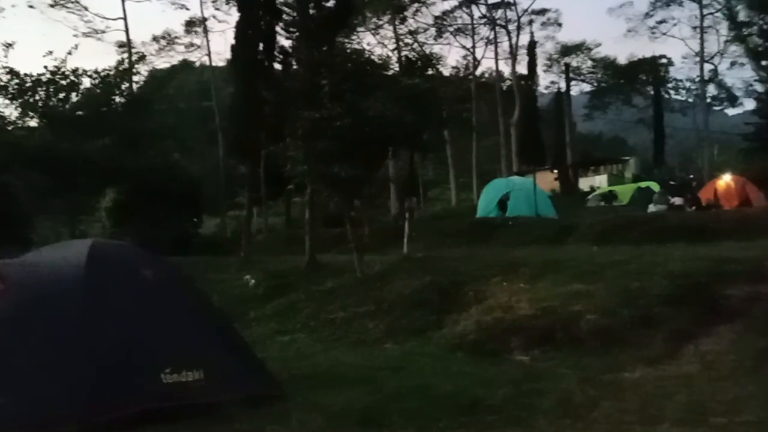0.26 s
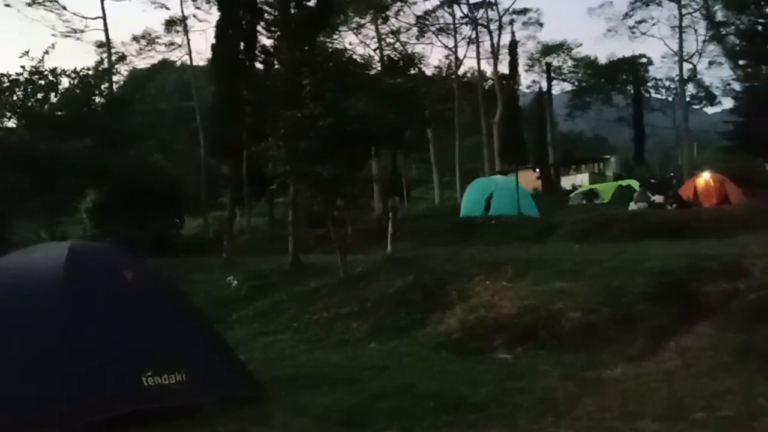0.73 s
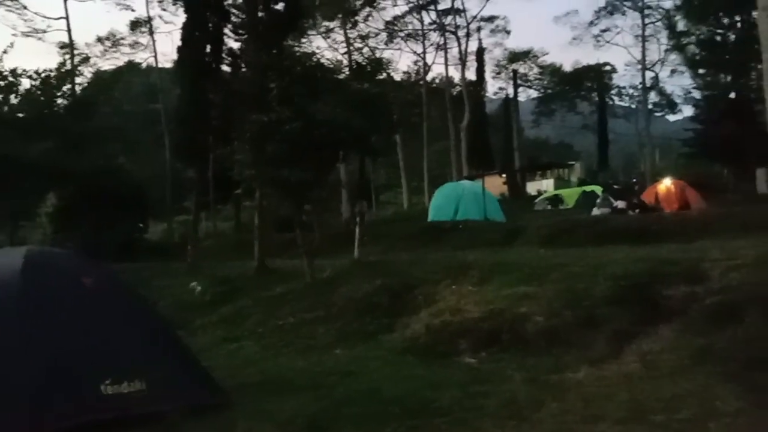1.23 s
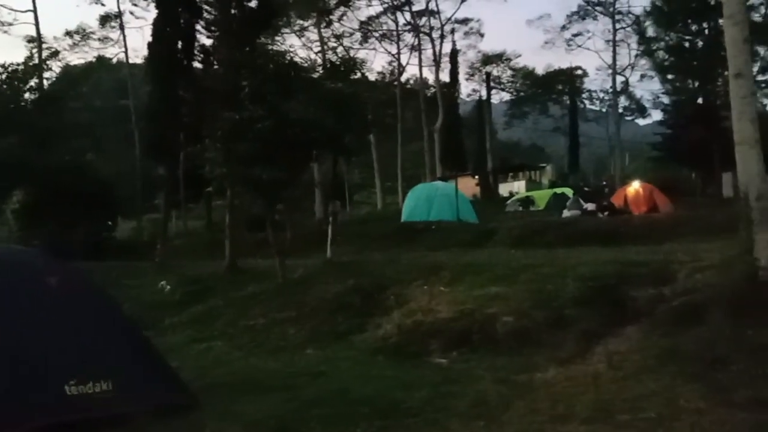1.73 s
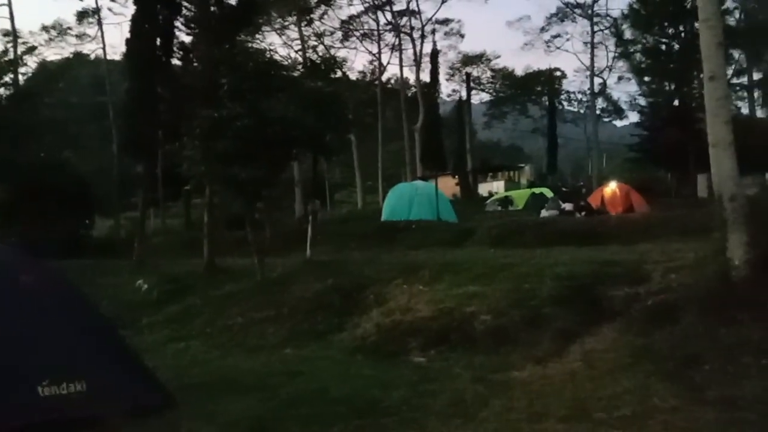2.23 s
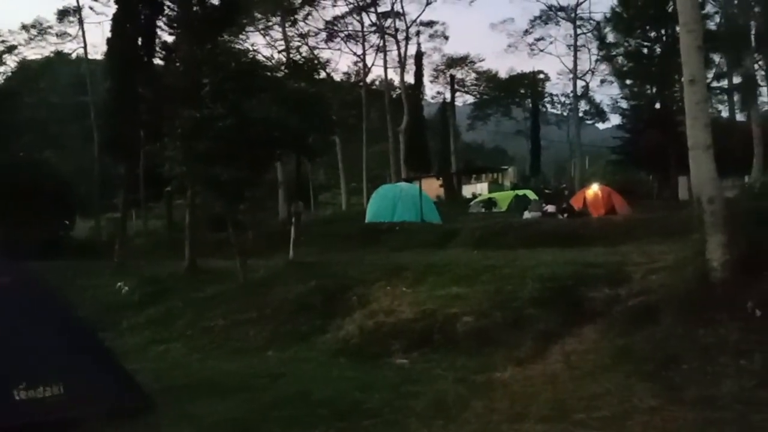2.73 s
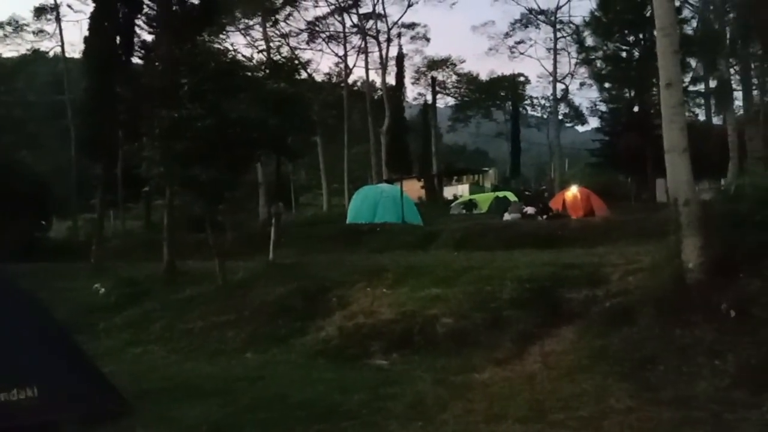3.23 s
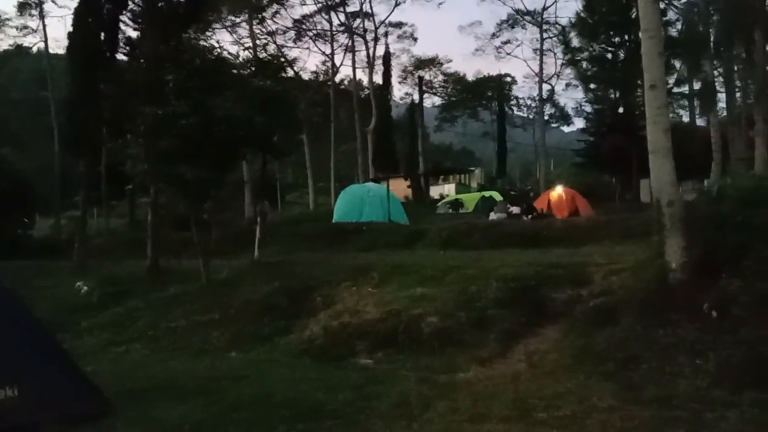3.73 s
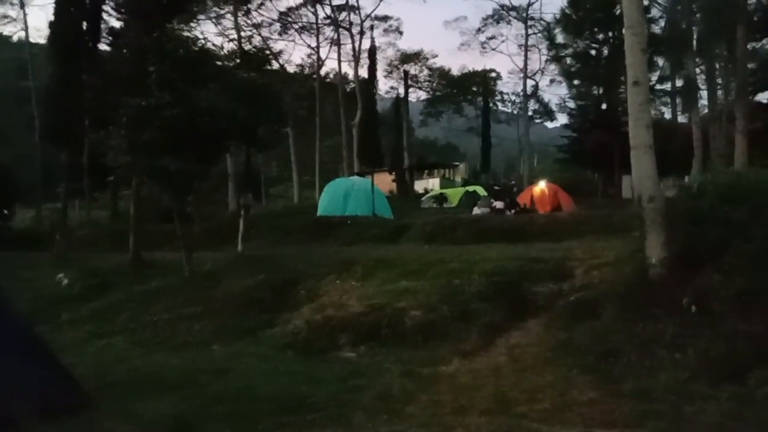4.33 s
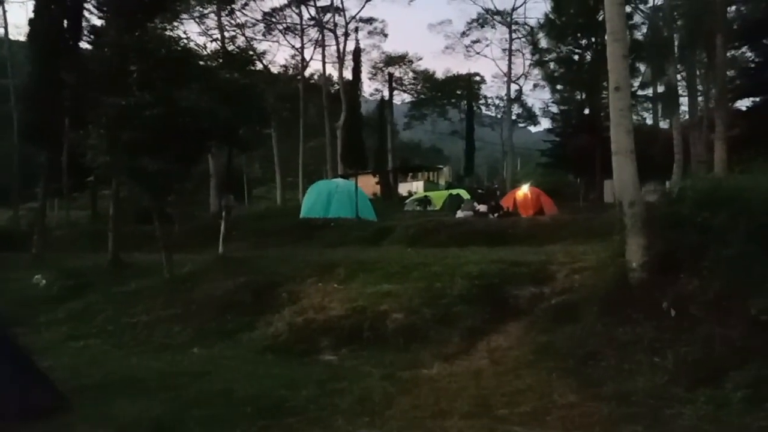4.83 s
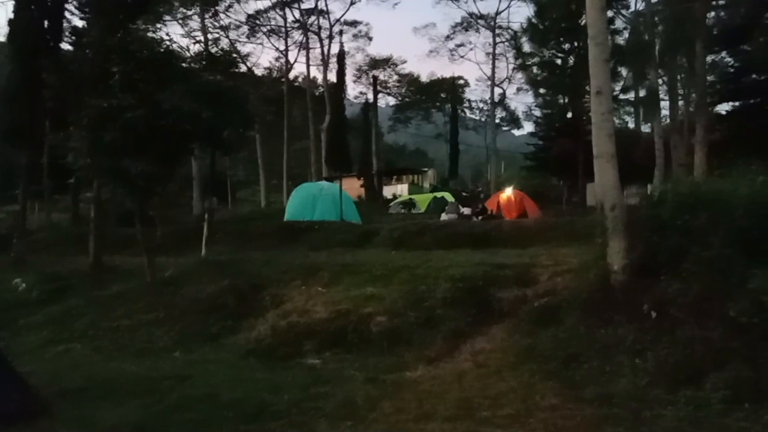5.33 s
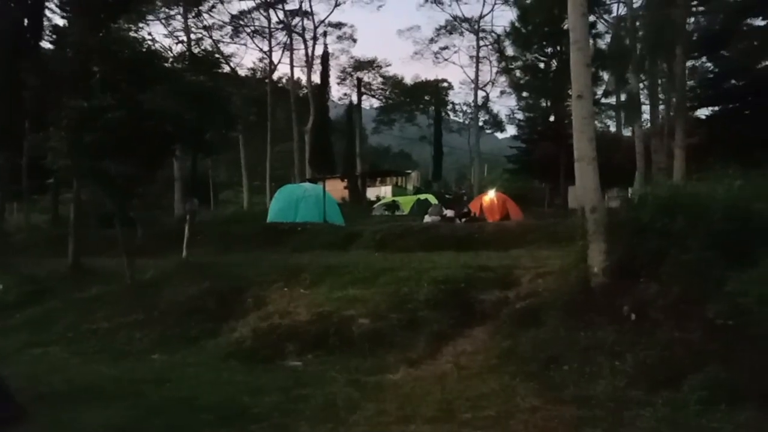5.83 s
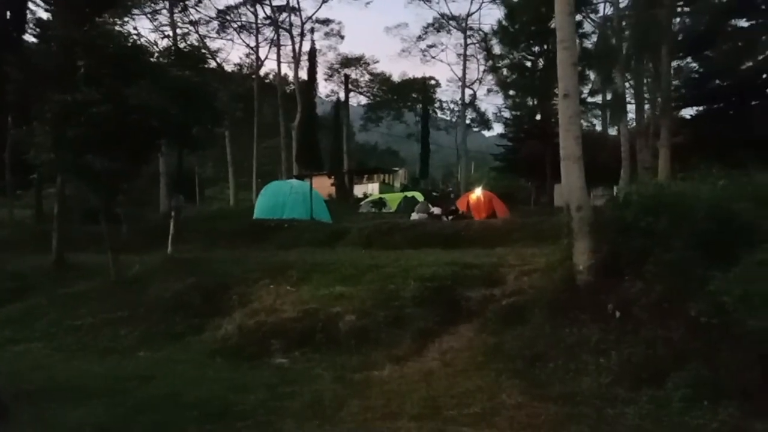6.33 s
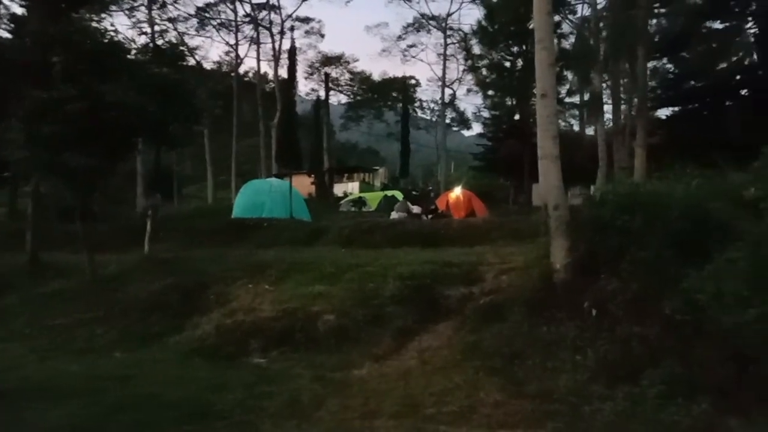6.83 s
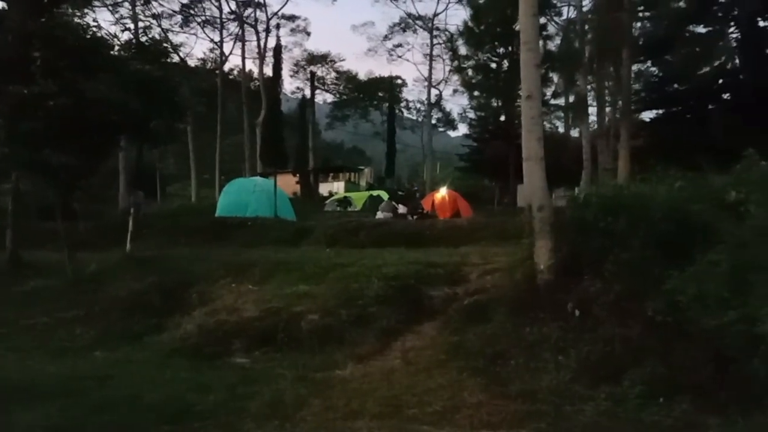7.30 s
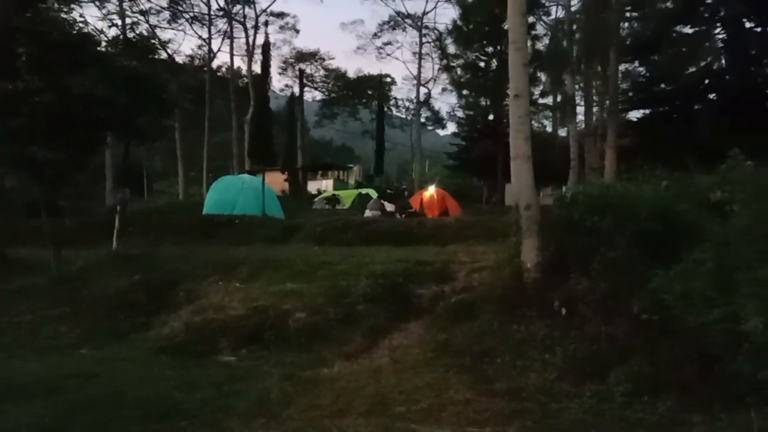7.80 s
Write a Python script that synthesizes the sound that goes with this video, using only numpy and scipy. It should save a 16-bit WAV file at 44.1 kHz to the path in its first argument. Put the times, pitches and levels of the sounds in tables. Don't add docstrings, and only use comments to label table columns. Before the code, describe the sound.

Dusk in open woodland, heard through a handheld phone. From the start, short bird whistles around 2 to 3.5 kilohertz glide, hook or hold, each lasting only a fraction of a second, with a brief diffuse echo from the trunks. Behind them is a continuous grainy chorus of far birds and insects, thin high katydid buzzing, leafy hiss and a faint low motor drone. A small cricket rasp comes about every second. Notes cluster in the first second, become sparser from 1 to 3, gather again at 3.4 to 4.1, and are loudest around 4.8 to 5.8 and 6.2 to 6.8. Soft, dull finger bumps start near 0.7, firmer at 5.5, 5.7, 6.6 and 7.3. At 7.6 a hard little knock bounces once. Throughout, noise suppression opens on loud calls and shuts afterward, making the background pump, until the chorus simply continues to the end at 8.

```python
import sys
import numpy as np
from scipy import signal
from scipy.fft import rfft, irfft, next_fast_len
from scipy.io import wavfile
from scipy.ndimage import uniform_filter1d

SR = 44100
rng = np.random.default_rng(int(sys.argv[2]) if len(sys.argv) > 2 else 0)


def master(y):
    cut = np.clip(np.atleast_2d(y).T, -1, 1)
    pcm = np.round(cut * 32767)
    wavfile.write(sys.argv[1], SR, pcm.astype(np.int16))


def invert_db(level):
    return 10 ** (np.asarray(level, dtype=float) / 20)


N = 355434
TIME = np.arange(N) / SR
SIZE = next_fast_len(N)
FREQ = np.arange(1, SIZE // 2 + 2) * SR / SIZE

# start in seconds, length in seconds, middle pitch in Hz,
# middle level in dB.
RISING_FADING = [
    (.286, .12, 3340, -53.5),
    (.598, .049, 2730, -48),
    (.728, 0.046, 2750, -45.5),
    (1.481, .049, 2510, -50.5),
    (2.246, .061, 2900, -46.5),
    (3.867, .038, 2690, -45.5),
    (5.2, .06, 3150, -52),
    (6.643, .064, 2590, -42.5),
    (7.0, .025, 2730, -45.5),
]
RISING_SWELLING = [
    (.565, 0.049, 2218, -44.5),
    (1.82, 0.022, 3080, -53.5),
    (3.647, 0.012, 2865, -48.5),
    (4.047, .054, 2640, -44),
    (5.08, 0.031, 3517, -38),
    (6.687, 0.06, 2106, -43.5),
]
HELD_FADING = [(.06, .13, 2767, -55.5), (.505, 0.082, 3070, -46.5), (.14, .06, 2140, -60),
               (.93, .02, 1660, -49.5), (2.832, 0.018, 3300, -58.5), (1.108, 0.026, 3240, -54.5),
               (1.358, .03, 2660, -55), (3.397, 0.017, 2800, -46), (3.427, 0.025, 2790, -43),
               (3.47, .035, 3280, -52), (3.54, .16, 3300, -58), (6.593, 0.049, 2720, -36.5),
               (6.76, 0.019, 2233, -41.5), (7.043, 0.22, 2700, -53.5)]
HELD_SWELLING = [(4.383, 0.027, 3100, -57), (.775, 0.062, 3200, -51), (.846, 0.081, 2540, -39.5),
                 (.875, .04, 3200, -49), (3.693, 0.11, 2660, -50.5), (4.764, 0.028, 3134, -37.5),
                 (4.852, .075, 2842, -35), (5.909, 0.049, 2600, -49), (6.206, 0.025, 3190, -42.5),
                 (6.555, .03, 2800, -44), (6.68, .052, 3120, -48.5), (7.936, 0.025, 3384, -44)]
FALLING_SWELLING = [
    (.632, 0.04, 2785, -49.5),
    (.759, 0.026, 2650, -45),
    (2.19, .06, 2960, -39),
    (3.742, 0.067, 3180, -51),
    (5.036, .06, 2555, -34.5),
    (6.335, 0.13, 2625, -45),
    (6.477, 0.045, 2660, -44),
    (7.26, .03, 2720, -43),
]
FALLING_FADING = [
    (.967, 0.073, 2264, -50.5),
    (2.34, .035, 2870, -52),
    (3.455, .03, 2680, -48.5),
    (3.515, 0.067, 2760, -46.5),
    (5.47, 0.029, 2920, -56),
    (6.025, 0.036, 2790, -50.5),
    (5.97, .035, 2250, -48),
]
# start in seconds, length in seconds, middle pitch in Hz,
# middle level in dB.
PEEPS = [(.14, 0.11, 3190, -63.5), (1.6, .025, 2830, -60.5), (2.53, 0.063, 3650, -70),
         (3.07, 0.047, 3360, -61.5), (4.79, 0.081, 2550, -58), (6.25, 0.048, 2710, -53.5),
         (6.29, 0.037, 3430, -53.5), (6.3, 0.038, 2680, -52), (7.19, .035, 2770, -48.5),
         (7.71, .015, 3440, -60), (7.745, .015, 3300, -57), (7.875, .012, 3420, -58),
         (7.275, .012, 3420, -54), (7.32, .015, 3120, -50), (7.9, 0.0099, 3150, -61),
         (5.56, .03, 3250, -49), (6.5, .07, 2600, -47.5), (5.47, 0.033, 2930, -48.5)]
# start in seconds, length in seconds, settled pitch in Hz,
# middle level in dB, swing in Hz (+ from above, - from below).
HOOKED_FADING = [(.238, .045, 3200, -47, 330), (.33, .093, 2714, -39.5, 351), (.655, .084, 2675, -39, 199),
                 (1.445, .02, 2810, -52, 300), (1.79, 0.027, 2940, -51.5, 330),
                 (2.578, 0.043, 2740, -54, 249), (2.93, 0.04, 2260, -48.5, 501),
                 (2.996, .025, 2220, -52, 450), (5.272, 0.071, 3207, -38.5, -200),
                 (5.352, .05, 2938, -36.5, -300), (6.965, .025, 2680, -46.5, 153),
                 (2.873, 0.046, 2193, -49.5, -150), (5.396, 0.052, 2927, -37.5, 201),
                 (3.757, .055, 2750, -37.5, -200), (3.897, .033, 3080, -36, -350),
                 (2.157, .03, 3030, -45, 250), (7.765, .035, 2680, -52, 300)]
HOOKED_SWELLING = [
    (.445, .045, 3050, -46, 260),
    (1.468, 0.066, 2900, -44, 180),
    (1.657, .045, 3497, -43, 149),
    (4.43, .03, 2830, -52, 120),
    (5.63, 0.054, 2985, -33, -350),
    (5.685, .082, 2850, -33, -650),
    (5.744, 0.037, 3220, -39.5, -200),
    (3.15, .06, 2780, -50.5, 121),
    (2.05, .05, 3220, -42, -300),
    (3.607, .075, 2830, -46.5, -600),
]
# start in seconds,
# length in seconds, start pitch in Hz, end pitch in Hz, middle level in dB.
SLURS = [(1.136, .016, 2940, 2680, -47.5), (.92, .05, 2450, 2715, -44.5), (1.875, .07, 2610, 2000, -55),
         (2.85, .022, 3300, 3050, -57.5), (2.742, .01, 2300, 2720, -56), (4.025, .025, 3200, 2680, -51),
         (4.41, .025, 3130, 2800, -52.5), (5.45, .035, 2900, 2650, -47), (5.585, .012, 3290, 2800, -46.5),
         (5.685, .015, 3006, 2800, -39.5), (.886, 0.033, 2600, 1784, -36.5), (3.298, .014, 3000, 2800, -53),
         (3.472, .03, 2640, 2230, -48), (3.505, .022, 3300, 2820, -50), (3.81, .015, 2760, 2600, -46),
         (2.105, .045, 3220, 3100, -51), (5.35, .03, 3420, 3200, -46), (4.095, 0.0093, 2790, 3100, -45.5),
         (5.091, .021, 2390, 2100, -40), (5.285, .045, 2720, 2204, -44.5), (5.4, 0.028, 3390, 4450, -40),
         (6.375, .05, 3300, 4190, -52), (.488, 0.016, 3050, 2380, -41.5), (6.385, 0.045, 2750, 2350, -38),
         (7.288, .035, 2700, 2250, -43), (7.955, 0.039, 2800, 3360, -48.5)]
PUSHES = [
    (.793, .028, 1850, 2420, -44),
    (5.515, .038, 2950, 3380, -41),
    (3.28, .02, 2400, 2950, -56),
    (1.94, 0.021, 4150, 4600, -57.5),
    (2.753, .018, 2720, 2210, -54),
    (4.107, 0.024, 2900, 2307, -41.5),
    (4.35, 0.025, 3620, 3250, -64.5),
    (6.616, .031, 2670, 2350, -35.5),
    (7.21, .12, 1900, 2170, -51.5),
    (7.975, .03, 4000, 4600, -58),
]
HOOTS = [
    (.272, 0.053, 568, 588, -64.5),
    (.345, 0.073, 600, 505, -66),
    (2.952, 0.052, 840, 910, -76),
    (3.9, 0.082, 868, 895, -60.5),
]


def song():
    kinds = [  # notes, glide in Hz, swell in dB from start to end
        (RISING_FADING, 120, -6.5), (RISING_SWELLING, 113, 1.6),
        (HELD_FADING, 0, -5.5), (HELD_SWELLING, 0, 4.8),
        (FALLING_SWELLING, -130, 8), (FALLING_FADING, -200, -7), (PEEPS, -15, -1.9)]
    notes = []
    for rows, glide, swell in kinds:
        for s, length, hz, db in rows:
            notes.append((s, length, hz - glide / 2, hz + glide / 2, db - swell / 2, db + swell / 2, 0))
    for rows, swell in ((HOOKED_FADING, -4), (HOOKED_SWELLING, 3)):
        for s, length, hz, db, swing in rows:
            notes.append((s, length, hz, hz, db - swell / 2, db + swell / 2, swing))
    for rows, swell in ((SLURS, -6), (PUSHES, 9), (HOOTS, 4)):
        for s, length, hz0, hz1, db in rows:
            notes.append((s, length, hz0, hz1, db - swell / 2, db + swell / 2, 0))
    return notes


def leaf_scatter(notes, rest_db):
    s, length, hz0, hz1, db0, db1, swing = np.transpose(notes)
    depth_db = np.interp(s, TIME, rest_db) + 39 - (db0 + db1) / 2
    rough = np.clip(depth_db / 29, .06, .42)
    rough = rough * np.where(hz0 > 1200, 1, .3)
    rough = rough / (1 + abs(hz1 - hz0) / length / 30000)
    return rough * np.where(swing, .8, 1)


def whistles(rows, edge_s, rough):
    out, envelope = np.zeros(N + SR), np.zeros(N + SR)
    scatter = np.pad(walk(70) + 1j * walk(82), (0, SR), "reflect") / np.sqrt(2)
    waver = .025 * scatter.imag[::-1]
    swing_s, swing_db_per_khz = .007, -11
    for n, (s, length, hz0, hz1, db0, db1, *swing) in enumerate(rows):
        t = np.arange(int((length + edge_s) * SR)) / SR
        u = np.clip((t - edge_s / 2) / length, 0, 1)
        here = slice(n * 3001 % N, n * 3001 % N + len(t))
        bend = sum(swing) * np.exp(-u * length / swing_s)
        level_db = db0 + (db1 - db0) * u + swing_db_per_khz * abs(bend) / 1000
        edges = np.clip(np.minimum(t, t[-1] - t) / edge_s, 0, 1)
        shape = invert_db(level_db) * np.sin(np.pi / 2 * edges) ** 2
        pitch = (hz0 + (hz1 - hz0) * u + bend) * (1 + rough[n] * waver[here])
        tone = np.exp(2j * np.pi * np.cumsum(pitch) / SR)
        path = np.sqrt(1 - rough[n]) + np.sqrt(rough[n]) * scatter[here]
        k = max(int((s - edge_s / 2) * SR), 0)
        out[k:k + len(t)] += shape * (tone * path).imag
        envelope[k:k + len(t)] += shape
    return out[:N], envelope[:N]


def wood(x, t60):
    t = np.arange(SR // 2) / SR
    echo = rng.standard_normal(len(t)) * np.exp(-np.log(1000) * t / t60)
    earlier = np.append(x[-len(t):], x)
    return signal.fftconvolve(earlier, echo / np.sqrt(np.sum(echo ** 2)))[len(t):][:N]


def song_echoes(near):
    treble = np.gradient(near) * SR / (2 * np.pi * 2800)
    return invert_db(-14) * wood(treble, 0.53)


# start in seconds, spacing of strokes in seconds, level in dB.
CHIRPS = [
    (0.011, .034, -72),
    (.995, 0.031, -62.5),
    (2.094, 0.031, -60),
    (3.06, 0.031, -63),
    (4.095, 0.034, -63),
    (5.396, .0352, -58.5),
    (6.311, 0.035, -59.5),
    (7.36, 0.028, -58),
]
STROKES = [4, 4, 6, 5, 6, 6, 6, 4]


def cricket():
    strokes = []
    for (s, step, db), count in zip(CHIRPS, STROKES):
        for k in range(count):
            strokes.append((s + k * step, .009, 6330, 6140, db + 0.2 * k + 7.5, db + 0.39 * k + 4.0))
    tones = whistles(strokes, 0.0073, np.full(len(strokes), .3))[0]
    return tones + invert_db(-10.5) * wood(tones, 0.073)


# start in seconds, level in dB.
TAPS = [
    (7.608, -32),
    (7.620, -36),
]
# frequency in Hz, decay by 60 dB in seconds, level in dB.
TAP_MODES = [(1370, 0.061, -21), (1778, 0.053, -1.5), (3100, 0.0099, -8), (4980, 0.0032, -7.5),
             (7100, .007, -17.5), (8450, 0.0071, -19), (11040, 0.0074, -22), (14000, .004, -60)]


def taps():
    t, out = np.arange(SR // 20) / SR, np.zeros(N)
    contact = np.minimum(t / 0.0012, 1) * np.exp(-t / 0.0087) * (t < .011)
    for s, db in TAPS:
        for hz, t60, mode_db in TAP_MODES:
            ring = np.sin(2 * np.pi * hz * t) * np.exp(-np.log(1000) * t / t60)
            knock = signal.fftconvolve(ring, rng.standard_normal(len(t)) * contact)
            knock = knock / abs(knock).max()
            out[int((s - .001) * SR):][:len(knock)] += invert_db(db + mode_db) * knock
    return signal.sosfilt(signal.butter(8, [1180, 14500], "band", fs=SR, output="sos"), out)


# start in seconds, level in dB.
THUDS = [
    (0.73, -73),
    (2.25, -75),
    (3.56, -66.5),
    (3.91, -62.5),
    (4.76, -69),
    (5.51, -57.5),
    (5.71, -59.5),
    (6.36, -74),
    (6.648, -54.5),
    (7.29, -59),
]


def thuds():
    t, out = np.arange(SR // 8) / SR, np.zeros(N)
    for s, db in THUDS:
        out[int(s * SR):][:len(t)] += invert_db(db) * 2.4 * t / 0.02 * np.exp(-t / 0.011)
    return out * (0.33 * band(62, 15) + 0.69 * band(84, 30) + 1.36 * band(150, 25))


def swarm(kinds, scatter_db, wet_db):
    out, count = 0, 1700
    for hz, spread, rate, length, glide, db in kinds:
        when, long = rng.random((2, count))
        pitch, bend, size = np.clip(rng.standard_normal((3, count)), -1.7, 1.7)
        when = when * count / rate
        pitch = hz + spread * pitch
        size = scatter_db * size
        long = length * (0.366 + 1.244 * long)
        rows = np.transpose([when, long, pitch - glide * bend, pitch + glide * bend, size, size])
        calls = whistles(rows[when < N / SR], .011, np.full(count, .45))[0]
        out = out + invert_db(db) * unit(calls)
    return out + invert_db(wet_db) * wood(out, 0.98)


# pitch in Hz, spread in Hz, calls per second, call length in seconds, glide in Hz, level in dB.
FAR_BIRDS = [(1782, 129, 90, 0.0301, 100, -8), (2350, 220, 130, 0.03155, 156.8, 1),
             (2800, 170, 110, 0.0367, 100.3, -0.5), (3250, 80, 50, 0.045, 83, -7)]


def far_birds(lift_db):
    return invert_db(12 + 0.45 * lift_db) * swarm(FAR_BIRDS, 3.5, 1.3)


# pitch in Hz, spread in Hz, calls per second, call length in seconds, glide in Hz, level in dB.
FAR_INSECTS = [(4217, 188.4, 200, .015, 100, -2), (5065, 130, 150, 0.018, 92, -9.5)]


def far_insects():
    return invert_db(7.5) * swarm(FAR_INSECTS, 1.8, 0.99)


# pitch in Hz, spread in Hz, calls per second, call length in seconds, glide in Hz, level in dB.
KATYDIDS = [(11140, 170, 180, 0.02, 70, -0.5), (10400, 280, 30, 0.014, 230, -7)]
# middle in seconds, width in seconds, level change in dB.
KATYDID_BOUTS = [(0, 0.21, -9), (.7, 0.3, 3.5), (2.2, .15, 5), (3.2, .2, 4), (3.8, .15, 6), (4.2, .2, 4),
                 (4.75, .12, 4), (5.75, .2, 4), (6.25, 0.17, -4.5), (6.67, 0.065, 8), (7.36, 0.069, 6.5),
                 (7.4, .55, 7)]


def katydids(lift_db):
    level_db = -95.5 + 0.43 * lift_db + bumps(KATYDID_BOUTS) + 1.3 * walk(6.6)
    return invert_db(level_db) * swarm(KATYDIDS, 5.5, -5)


# frequency in Hz, spectral density in dB per Hz.
AIR = [(60, -26), (300, -2.5), (800, -5.5), (1250, -3.5), (1700, 7.5), (3300, -4.5), (3650, 0), (4300, 8),
       (5400, 1.5), (5850, -5.5), (6500, 6), (7350, 0.5), (8700, -6), (9150, -16), (9330, -27)]


def air():
    hz, db = np.transpose(AIR)
    gain = invert_db(np.interp(np.log(FREQ), np.log(hz), db, left=-60, right=-60))
    return invert_db(13.5) * coloured(gain) * invert_db(1.21 * walk(2))


# frequency in Hz, width in Hz, level in dB.
DRONE_BANDS = [(118, 30.6, -5.5), (160, 33, -4), (95, 29, -10.5), (253.5, 53, -10)]
# time in seconds, pitch in Hz, level over the treble in dB.
HUM = [(0, 160, -9), (4.6, 168, -17), (4.8, 168, 1.5), (6, 158, -17), (6.7, 163, -1), (7.2, 165, 1.5),
       (7.6, 152, 0.5), (8.06, 150, -3)]
# time in seconds, pitch in Hz, level over the treble in dB.
GROWL = [(0, 125.7, -40.5), (5.1, 122.3, -36), (5.25, 126, 2), (6.05, 134.1, -4.5), (6.2, 132, -33),
         (8.06, 130, -43)]
# middle in seconds, width in seconds, level change in dB.
SURGES = [
    (3.04, 0.25, -2.5),
    (3.45, 0.026, 8.5),
    (3.8, 0.27, 4),
    (4.31, 0.027, 11.5),
    (6.0, 0.086, 2),
    (6.63, 0.11, 3),
    (7.42, .1, 3.5),
    (6.3, .12, -5),
    (.6, .25, -4),
    (7.9, .1, -3),
]


def drone(lift_db):
    hum = 0
    for table, octave_db in ((HUM, -25), (GROWL, -9)):
        hum_hz, hum_db = curve(table)
        phase = 2 * np.pi * np.cumsum(hum_hz + 2.0 * walk(3.1)) / SR
        waves = np.sin(phase) + invert_db(octave_db) * np.sin(2 * phase)
        hum = hum + invert_db(hum_db + 1.4 * walk(10.0) + 1.0) * waves
    db = -0.5 - 0.32 * lift_db + bumps(SURGES)
    noise = sum(invert_db(db + part_db + 4.26 * walk(3.2)) * band(hz, width) for hz, width, part_db in DRONE_BANDS)
    return hum + noise


def hiss(gate_db):
    return invert_db(-88 + 0.11 * (gate_db + 77.5)) * band(6400, 9000)


# middle in seconds, width in seconds, pitch
# in Hz, width in octaves, level change in dB.
LULLS = [(5.45, .13, 2200, .12, -6), (6.42, .1, 1650, .15, -6), (5.9, .15, 1600, .15, -5),
         (7.4, .1, 2150, .15, -3), (6.27, .17, 600, .8, -5), (4.25, .2, 3300, .08, -6),
         (1.35, .2, 3200, .08, -5), (2.55, .25, 1650, .1, 5), (.6, .3, 4250, .06, 3),
         (3.4, .12, 1550, .15, -5), (2.76, .05, 2740, .05, -8), (5.74, .05, 2050, .08, -6),
         (5.4, .06, 1750, .1, 5), (2.0, .15, 2200, .15, -4), (7.1, .1, 2900, .15, -3),
         (.3, .4, 5500, .1, -3)]


def suppress(x, power, patchy_db):
    f, t, z = signal.stft(x, SR, nperseg=512, noverlap=384)
    lull_db = 0
    for s, width, hz, octaves, db in LULLS:
        off_pitch = np.log2((f[:, None] + 1) / hz) / octaves
        lull_db = lull_db + db * np.exp(-.5 * off_pitch ** 2 - .5 * ((t - s) / width) ** 2)
    usual = np.mean(abs(z) ** 2, axis=1, keepdims=True) + 1e-20
    now = uniform_filter1d(abs(z) ** 2 / usual, size=12, axis=1)
    now = uniform_filter1d(now, size=2, axis=0)
    drift = uniform_filter1d(rng.standard_normal(z.shape), size=110, axis=1)
    gain = now ** power * invert_db(patchy_db * unit(drift) + lull_db)
    return signal.istft(z * gain, nperseg=512, noverlap=384)[1][:N]


# time in seconds, level in dB.
REST = [(0, -78), (.6, -76.5), (.95, -72.5), (1.12, -76), (2.0, -77.5), (2.26, -72.5), (2.4, -78.5),
        (3.36, -77.5), (3.6, -77), (4.2, -75.5), (4.45, -79.5), (5.0, -77.5), (5.3, -75), (5.9, -73.5),
        (6.12, -76), (6.5, -74.5), (7.13, -75), (8.06, -76)]


def resting_gain():
    return curve(REST)[0]


# middle in seconds, width in seconds, level change in dB.
MISJUDGEMENTS = [
    (1.75, 0.071, -3),
    (4.37, 0.017, -4.5),
    (4.97, 0.012, -5),
    (5.6, 0.045, -3),
    (5.86, 0.08, 4.5),
    (7.05, 0.017, 1.5),
]


def misjudged():
    return bumps(MISJUDGEMENTS)


def linger(envelope):
    width = int(0.073 * SR)
    slow = uniform_filter1d(uniform_filter1d(envelope, width), width)
    return 0.2 * 20 * np.log10(1 + slow / invert_db(-50.5))


def opening(envelope):
    return 0.31 * 20 * np.log10(1 + uniform_filter1d(envelope, size=400) / invert_db(-53.5))


# time in seconds, level change in dB.
SHUTS = [
    (.418, -4),
    (2.25, -3),
    (3.812, -6),
    (4.133, -6),
    (4.795, -5),
    (4.932, -8),
    (5.115, -6),
    (5.771, -8),
    (6.772, -4),
]


def slams():
    return invert_db(sum(db * np.exp(-abs(TIME - s) / .03) * (TIME > s) for s, db in SHUTS))


def curve(table):
    s, *columns = np.transpose(table)
    return [np.interp(TIME, s, c) for c in columns]


def bumps(rows):
    return sum(db * np.exp(-.5 * ((TIME - s) / width) ** 2) for s, width, db in rows)


def unit(x):
    return x / np.sqrt(np.mean(x ** 2))


def coloured(gain):
    return irfft(rfft(rng.standard_normal(SIZE)) * gain, SIZE)[:N]


def band(hz, width_hz):
    return unit(coloured(np.exp(-.5 * ((FREQ - hz) / width_hz) ** 2)))


def walk(rate):
    return band(0, rate)


def scene():
    rest_db = resting_gain()
    notes = song()
    near, envelope = whistles(notes, 0.016, leaf_scatter(notes, rest_db))
    knocks = taps()
    opening_db = opening(envelope + abs(knocks))
    gate_db = rest_db + misjudged() + linger(envelope)
    lift_db = gate_db + 74
    echoes = invert_db(opening_db + misjudged()) * song_echoes(near)
    chorus = suppress(air() + far_birds(lift_db) + far_insects(), power=.25, patchy_db=3.0)
    behind = invert_db(gate_db + opening_db - 4.0) * (chorus + drone(lift_db))
    gated = near + echoes + cricket() + knocks + thuds() + behind + katydids(lift_db)
    return (slams() * gated + hiss(gate_db))[None]


def band_limit(x):
    return signal.sosfilt(signal.butter(12, 15400, fs=SR, output="sos"), x)


# frequency in Hz, width in Hz, level change in dB.
PORT_DIPS = [(3470, 266, -2.5), (5370, 38, 2.5), (6210, 54, -5), (5690, 78, -0.5), (5600, 57, -7.5),
             (7330, 130, -7), (6040, 70, -4), (4780, 81, -2.5)]


def record(dry):
    dips_db = sum(db * np.exp(-.5 * ((FREQ - hz) / width) ** 2) for hz, width, db in PORT_DIPS)
    mix = irfft(rfft(dry, SIZE) * invert_db(dips_db), SIZE)[:, :N]
    return band_limit(mix)


dry = scene()
out = record(dry)
master(out)
```